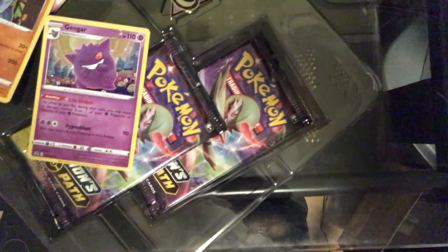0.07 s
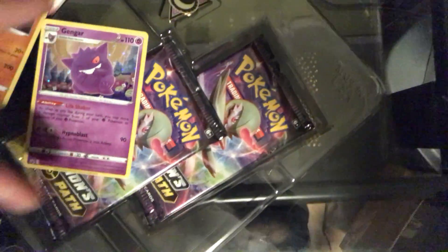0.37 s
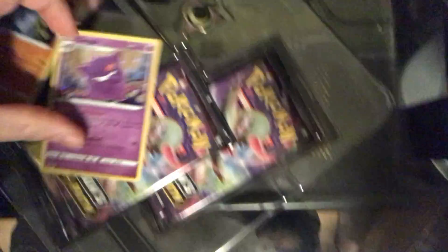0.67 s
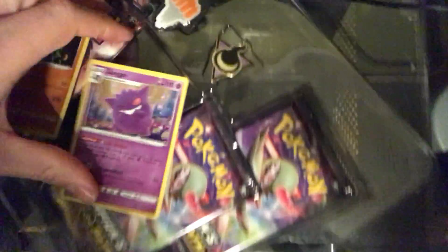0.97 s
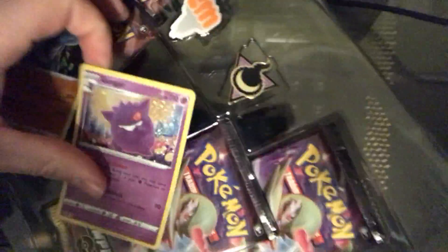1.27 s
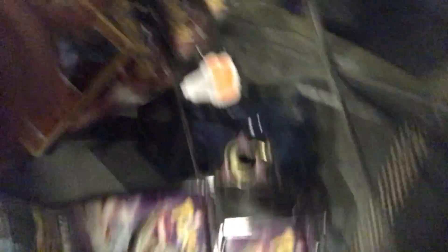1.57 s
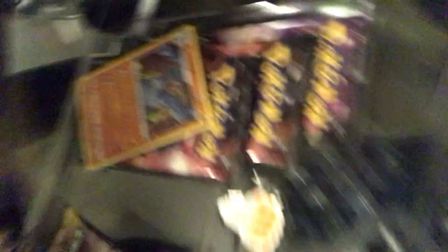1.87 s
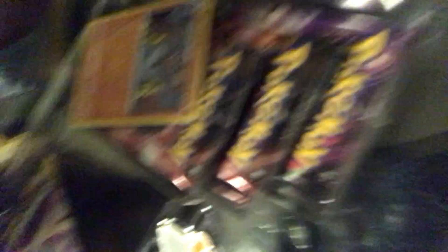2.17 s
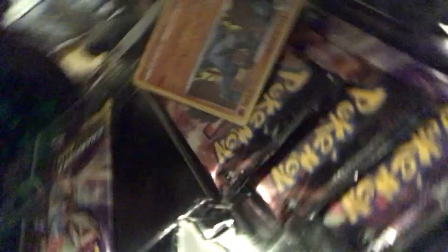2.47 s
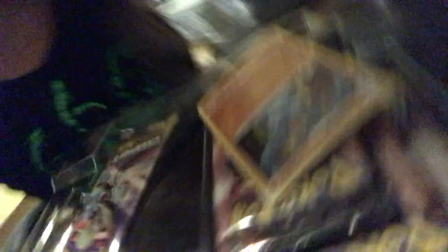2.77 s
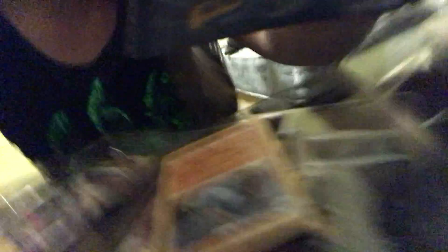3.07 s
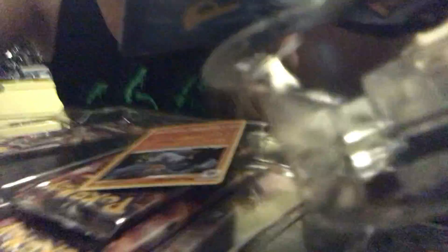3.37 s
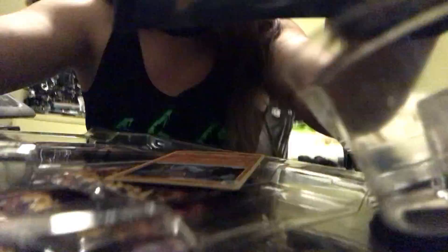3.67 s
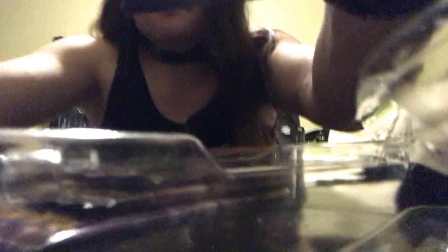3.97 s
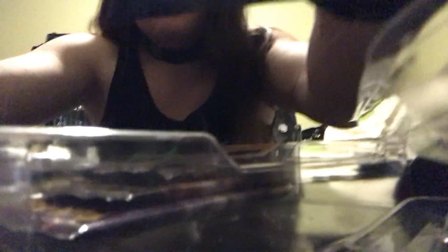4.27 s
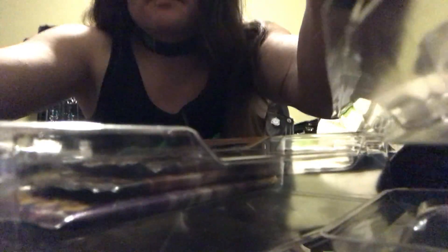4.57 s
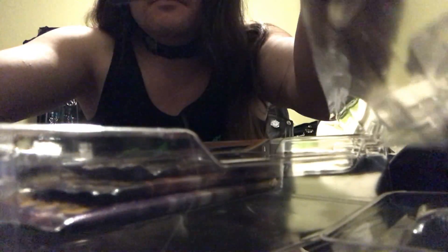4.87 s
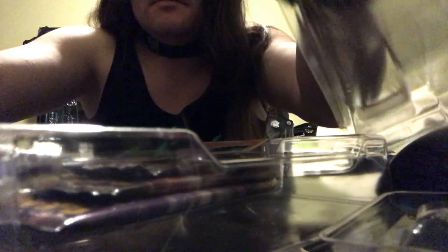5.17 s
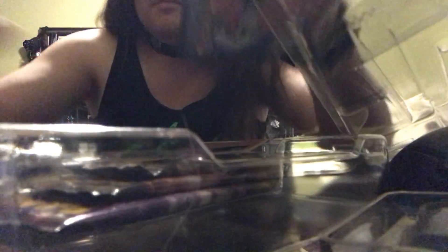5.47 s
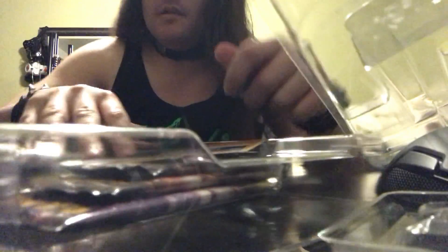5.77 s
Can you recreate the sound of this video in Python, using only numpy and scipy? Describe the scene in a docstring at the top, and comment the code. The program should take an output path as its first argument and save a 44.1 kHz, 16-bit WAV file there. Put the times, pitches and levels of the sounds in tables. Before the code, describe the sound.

A thin plastic tray is handled on a table in a small room, very close to the microphone, giving irregular hollow clicks and taps. A card swipes quickly over foil packs, and the plastic scrapes, creaks and squeaks faintly. The microphone rumbles as it is moved and lands with a hard knock. After a short lull, fingers tap the tray again over faint room hiss.

```python
"""On a table in a small room, a thin clear plastic tray is handled close to a small camera.
Each touch sends a bending wave through the sheet (treble first, bass last) and rings the tray.
Card and skin scrape, judder and squeak on it, creases crackle, and a card slides over foil packs.
The camera rumbles as it is moved and lands with a hard knock; then fingers tap the tray.
Underneath lie the room's hiss and, early on, a low hum."""
import sys
import numpy as np
from scipy import signal
from scipy.fft import rfft, irfft, next_fast_len
from scipy.io import wavfile
from scipy.ndimage import map_coordinates

SR = 44100
rng = np.random.default_rng(int(sys.argv[2]) if len(sys.argv) > 2 else 0)


def wav_out(sig):
    """Save sig, one row per channel (or a flat mono array), as 16-bit PCM at SR to the path in sys.argv[1]."""
    wavfile.write(sys.argv[1], SR, np.round(np.clip(np.atleast_2d(sig).T, -1, 1) * 32767).astype(np.int16))


N = 261407

# the room's reverb time: f/Hz, t60/s
ROOM_DECAY = [(100, 0.34), (400, 0.12), (1500, 0.29), (4000, .24), (12000, 0.17)]
# how busy the hands are on foil and plastic: t/s, level/dB
HAND_ACTIVITY = [(0.0, -46), (0.33, -82), (0.58, -104), (0.99, -62.5), (1.32, -63.5), (1.83, -56),
                 (1.98, -56), (2.46, -64), (2.66, -57.5), (3.65, -58), (3.93, -56.5), (5.12, -63),
                 (5.42, -64.5), (5.93, -72)]


def amp(db):
    """Decibels to gain."""
    return 10 ** (np.asarray(db) / 20)


def unit(x):
    """Scale to rms 1."""
    return x / np.sqrt(np.mean(x ** 2) + 1e-20)


def along(points, hz):
    """Read (f/Hz, value) points on a log frequency axis."""
    f, v = np.transpose(points)
    return np.interp(np.log(hz + 1), np.log(f + 1), v)


def automation(points):
    """Join (t/s, value) points into one value per sample."""
    return np.interp(np.arange(N) / SR, *np.transpose(points))


def wobble(rate):
    """A smooth random curve, rate knots a second."""
    return map_coordinates(rng.standard_normal(int(N * rate / SR) + 4), [np.arange(N) * rate / SR])


def gesture(middle_s, length_s):
    """The hand speeds up and slows again: a bell-shaped envelope."""
    return np.exp(-4 * ((np.arange(N) / SR - middle_s) / length_s) ** 2)


def filtered(x, response):
    """Pass x through a frequency response."""
    size = next_fast_len(N + SR // 2)
    return irfft(rfft(x, size) * response(np.fft.rfftfreq(size, 1 / SR)), size)[:N]


def coloured(x, spectrum):
    """EQ x with (f/Hz, level/dB) points and scale it to rms 1."""
    return unit(filtered(x, lambda hz: amp(along(spectrum, hz))))


def resonance(f, hz, width):
    """Response of one damped resonance."""
    return 1j * f * width / (hz * hz - f * f + 1j * f * width)


def causal(gain):
    """The minimum-phase response that has this gain."""
    cepstrum = irfft(np.log(np.maximum(gain, 1e-6)))
    half = len(cepstrum) // 2
    return np.exp(rfft(np.r_[cepstrum[0], 2 * cepstrum[1:half], np.zeros(half)]))


def tail(t60s, size):
    """Dense echoes of energy 1, dying away as the (f/Hz, t60/s) points say."""
    hz, t, noise = signal.stft(rng.standard_normal(size), SR, nperseg=128)
    decay = amp(-60 * t / along(t60s, hz)[:, None])
    echoes = signal.istft(noise * decay, SR, nperseg=128)[1][:size]
    return echoes / np.linalg.norm(echoes)


def ring(modes, t, spread_db):
    """Decaying modes, each struck a little differently every time."""
    return sum(amp(db + spread_db * rng.standard_normal() - 60 * t / t60) * np.sin(2 * np.pi * hz * t)
               for hz, db, t60 in modes)


def friction(grain_db, rate):
    """Noise whose strength jumps as tiny ridges catch and let go."""
    return rng.standard_normal(N) * amp(grain_db * np.clip(wobble(rate), -2, 2))


def room_tone(level_db=-69.5):
    """The steady hiss of the room."""
    # room tone EQ: f/Hz, level/dB
    air_eq = [(65, -36.5), (110, -18), (210, -10.5), (243, -5), (264, -11.5), (392, -17), (1870, -26),
              (3800, -32), (4220, -29), (5760, -34), (16000, -37)]
    return amp(level_db) * coloured(rng.standard_normal(N), air_eq)


def hum(settled_hz=56.3, sag_hz=4.46, sag_s=0.446, level_db=-64, stop_s=1.44, fade_s=0.028):
    """A low hum sinks towards a steady pitch and stops."""
    t = np.arange(N) / SR
    hz = settled_hz + sag_hz * np.exp(-t / sag_s)
    release = np.exp(-np.maximum(t - stop_s, 0) / fade_s)
    return amp(level_db) * release * unit(np.sin(2 * np.pi * np.cumsum(hz) / SR))


def camera_rumble():
    """Handling the camera makes a bumpy low rumble."""
    # how hard the camera is handled: t/s, level/dB
    handling = [(0.0, -52.5), (0.4, -76), (0.99, -66.5), (1.62, -73), (2.62, -64), (3.05, -70.5),
                (3.2, -56), (4.0, -58), (4.94, -65.5), (5.3, -70), (5.48, -48), (5.93, -58)]
    # rumble EQ: f/Hz, level/dB
    rumble_eq = [(12, -42), (24, -22), (40, 3.5), (70, -2), (110, 3), (200, -12.5), (340, -12.5),
                 (550, -19), (900, -27.5), (1500, -78.5)]
    return amp(automation(handling)) * coloured(friction(grain_db=2.5, rate=18), rumble_eq)


def tray_taps(size=16384):
    """Each contact: a falling chirp, echoes from the tray's edges, its modes, a shudder and the room."""
    # contacts: t/s, strength/dB, weight/dB, hardness/dB, panel f/Hz, free ringing/dB
    contacts = [(.0016, -8.5, -2, 7, 945, 5), (0.0165, -17, 3, 8, 660, 1),
                (0.108, -9.5, -32, -5, 680, -1.5), (0.277, -12.5, 5, -17, 570, -9),
                (0.3681, -13.5, -7, -13, 620, -2), (0.58, -10, -1, 2.5, 690, 3),
                (.589, 5, -27, -3, 1100, -11.5), (.7457, 4.5, -10, 15, 2200, -5.5),
                (0.7887, 4, -10, 0, 1060, -6.5), (.8599, 7, -14, -21, 695, -2.5),
                (.8702, 9.5, -31, -1.5, 1000, -4), (0.8736, 9.5, -24, -4.5, 1060, -8.5),
                (0.8869, 2, -11.5, -15, 1040, -1.5), (.9218, -15.5, -8, 14.5, 1050, -3),
                (1.0391, 2.5, -7, -14, 630, -10.5), (1.0482, -11.5, -1, 8.5, 1140, -1),
                (1.1073, -13, -10, 3, 1010, -11), (1.1266, -15, -4, 12, 1040, -10),
                (1.2026, 1.5, -8, -16, 630, -15), (1.248, -26, 17, 15, 800, -4), (1.3, -4, 4, -2, 960, -11),
                (1.3423, -19.5, -19, 25.5, 2000, -11), (1.3512, -8.5, -20, 18, 2100, -14),
                (1.4641, -21.5, 14, -11, 600, -13), (1.575, 3, -24, 9, 970, -10.5),
                (1.5907, -7, 4.5, 17.5, 1460, -4), (1.866, -7.5, -8.5, 6.5, 2330, 3.5),
                (1.9734, -10.5, 0, -8.5, 940, -1), (2.0143, -16.5, 5, -4, 1000, -3),
                (2.0467, -16, 0, 12.5, 1260, 5), (2.0837, -24, 3, 15, 2180, 4),
                (2.1258, -2.5, -5, -6.5, 620, -2.5), (2.201, -13.5, 4.5, 19.5, 2400, 2),
                (2.5114, -12.5, 6, -7, 1170, -2), (2.6353, -26, 11, 18.5, 2000, 1),
                (2.828, -16, 6, -18, 1930, -12), (2.9482, -20.5, 7, 13, 790, -10),
                (3.0781, 8.5, -4, -5, 1000, -5.5), (3.1717, 0, -1, -6, 950, -4.5),
                (3.18, -15, -8, -26, 640, 5), (3.2689, -4, 4, -6.5, 1480, 2.5),
                (3.3298, -5, -3, -6, 730, -5), (3.3791, -14.5, 10, -2.5, 1000, -3.5),
                (3.4535, -20, 16.5, -4, 1170, -0.5), (3.5649, -15.5, 24.5, -1, 630, -7.5),
                (3.6504, -21.5, 25, -16.5, 640, -4), (3.6639, -5.5, 10, -20, 600, -25),
                (3.7797, -8.5, 5.5, -9.5, 600, -4), (3.8279, 13.5, 26.5, 1.5, 278.7, -16),
                (3.9848, -5.5, -13, -19, 760, -15), (4.0256, 5.5, -3.5, -14, 620, -1),
                (4.0468, 9.5, 11, 8, 569, -4.5), (4.077, -9.5, 3.5, -9, 1100, -16.5),
                (4.1587, -1.5, 12, -16.5, 720, -11), (4.217, -28.5, 4, 17.5, 970, -25),
                (4.2997, -9.5, 22.5, -23, 590, -16.5), (4.3485, 6, 16.5, -56, 1000, -16.5),
                (4.4909, -11, 21, -26, 620, -24), (4.5698, -16.5, 32, -14, 1020, -15),
                (4.5996, -10, 4.5, 4, 680, -11.5), (5.282, -20, -2, -8.5, 1500, 0),
                (5.2985, -5.5, 18, 0.5, 1380, 1), (5.4015, -7, -4, 4, 570, 7.5),
                (5.4085, -0.5, 12, 7.5, 690, 1), (5.4591, -1, 9.5, 2, 620, -3),
                (5.5033, -2, 9.5, -7.5, 1380, -3.5), (5.5843, -7.5, 6.5, 1.5, 1400, -7.5),
                (5.6228, -7, 18, -12, 1350, -7.5), (5.667, -24, 0, -2, 1400, -9),
                (5.6925, -13.5, 17.5, -13, 1400, -4), (5.759, -21.5, 6, -1, 1430, -3.5),
                (5.7983, -18.5, 26, 10.5, 1080, 1), (5.819, 4.5, -22, -20, 1430, -13),
                (5.8451, -9.5, 11, 6, 1380, -3), (5.9026, -3.5, -14, -2, 1340, -2.5)]
    # force of a medium contact: f/Hz, level/dB
    force_eq = [(12, -64.5), (30, -22.5), (62, 0), (120, -3.5), (350, -2.5), (1050, 0.5), (2700, -8.5),
                (7500, -22), (15500, -30.5)]
    # how far the weight of a push lifts the bass: f/Hz, share
    weight_share = [(80, 1), (350, 0.58), (950, 0.016)]
    # how far the hardness of an edge lifts the treble: f/Hz, share
    hardness_share = [(1200, 0.019), (2700, 0.61), (7500, 1)]
    # the tray's modes: f/Hz, level/dB, t60/s
    tray_modes = [(147, -11.5, .2), (194.7, -1.5, 0.082), (265.5, -6.5, 0.05), (344, -11, 0.05),
                  (408, -3, 0.063), (618, -2.5, 0.11), (668, 3.5, 0.13), (907, -7.5, 0.092),
                  (1195, 1.5, 0.046), (1290, -5.5, 0.11), (1868, -1.5, 0.092), (2060, -1, 0.15),
                  (2340, -5.5, 0.041), (2540, -5, 0.073), (2936, 5, 0.049), (3330, -3, .08),
                  (3370, 1, 0.03), (4615, -0.5, 0.05)]
    edge_decay = [(100, 0.32), (300, 0.12), (600, 0.11), (2000, 0.038), (6000, 0.031), (14000, 0.013)]
    shudder_db, shudder_rise_s, shudder_t60_s = -7, 0.03, 0.42
    t, f = np.arange(size) / SR, np.fft.rfftfreq(size, 1 / SR)
    fade = np.minimum(1, 2 - 2 * np.arange(size) / size) ** 2
    force_db, bass, treble = along(force_eq, f), along(weight_share, f), along(hardness_share, f)
    # bending waves are slower at low pitch: each frequency arrives about one cycle late
    dispersion = np.exp(-2j * np.pi * 0.7954 * np.log(1 + f / 45))
    chirp = amp(-1.5 + along([(1500, -3.1), (4000, -2), (10000, -1)], f)) * dispersion
    scatter_gain = amp(along([(800, -16), (3000, -7.5), (10000, -9)], f))
    out = np.zeros(N + 2 * size)
    for s, db, weight_db, hardness_db, panel_hz, ring_db in contacts:
        panel = 0.68 + 1.16 * np.abs(resonance(f, panel_hz, width=0.056 * panel_hz))
        strike = causal(amp(db + force_db + weight_db * bass + hardness_db * treble) * panel)
        # creases smear part of the treble over a few milliseconds
        scatter = rfft(tail([(1000, 0.019), (14000, 0.006)], size)) * scatter_gain
        edges = tail(edge_decay, size)
        modes = ring(tray_modes, t, spread_db=-2.5) * (1 - np.exp(-t / 0.002))
        ringing = amp(ring_db) * (edges + amp(-47.5) * modes)
        # the table shudders after a push: a low rumble swells and dies
        rocking_envelope = (1 - np.exp(-t / shudder_rise_s)) * amp(-60 * t / shudder_t60_s)
        rocking = rng.standard_normal(size) * rocking_envelope
        rocking /= np.linalg.norm(rocking)
        shudder = amp(shudder_db + ring_db) * rfft(rocking) * resonance(f, hz=95, width=55)
        reverb = amp(-20.5) * tail(ROOM_DECAY, size) * (1 - np.exp(-t / 0.0081))
        hit = irfft(strike * (chirp + scatter + shudder + rfft(ringing + reverb)))
        out[round(s * SR):][:size] += hit * fade
    return out[:N]


def rubbing():
    """Card and skin rub the sheet: a hollow scrape and a fine hiss, in strokes over a light rustle."""
    # broad strokes: middle t/s, length/s, scrape level/dB, hiss level/dB
    strokes = [(.01, 0.05, -43.5, -60), (0.678, 0.075, -65, -60.5), (0.748, 0.049, -50, -54),
               (0.793, 0.037, -54, -57), (0.917, 0.09, -53, -64), (1.142, 0.13, -52.5, -63.5),
               (1.301, 0.019, -52, -58), (1.433, 0.2, -84, -60), (1.571, 0.03, -50, -75),
               (1.746, 0.034, -48, -52.5), (2.075, 0.026, -59, -58.5), (2.201, 0.032, -61, -50.5),
               (2.268, 0.23, -60.5, -64), (2.775, 0.044, -54, -67), (2.943, 0.05, -58.5, -65),
               (3.075, 0.02, -45.5, -62), (3.135, 0.062, -57, -68), (3.172, 0.012, -47, -72),
               (3.264, 0.0084, -49, -79), (3.778, 0.051, -53, -64), (3.844, 0.047, -54, -66.5),
               (4.008, .06, -54, -65), (4.801, 0.047, -65, -74), (5.068, 0.032, -60, -65),
               (5.2, 0.018, -61.5, -68), (5.825, 0.049, -54, -61.5), (5.909, 0.076, -45.5, -57.5)]
    # the hollow body of the rub: f/Hz, level/dB
    scrape_eq = [(180, -58.5), (300, -11), (424, -3), (787, 0), (906, -3), (1210, -7), (1340, -0.5),
                 (1680, -11), (2560, -12), (4000, -21.5), (5200, -54.5), (8800, -120)]
    # its fine top end: f/Hz, level/dB
    hiss_eq = [(1060, -39), (1800, -7.5), (2430, -8), (3260, -3.5), (3710, -2.5), (4970, -7.5), (5490, 0),
               (6960, -7), (9080, -11), (10300, -13), (11300, -9), (14500, -10), (15300, -16),
               (16000, -21.5)]
    rustle = amp(automation(HAND_ACTIVITY) + 5 * wobble(rate=12))  # the rubbing comes and goes
    scrape_gain, hiss_gain = amp(-8) * rustle, amp(-18.5) * rustle
    for s, length, scrape_db, hiss_db in strokes:
        speed = gesture(s, length)
        scrape_gain = np.hypot(scrape_gain, amp(scrape_db) * speed)
        hiss_gain = np.hypot(hiss_gain, amp(hiss_db) * speed)
    scrape = coloured(friction(grain_db=4.5, rate=140), scrape_eq)
    hiss = coloured(friction(grain_db=5, rate=4700), hiss_eq)
    return scrape_gain * scrape + hiss_gain * hiss


def judder():
    """Stick-slip pulses, even or ragged, make the sheet groan."""
    # groans: middle t/s, length/s, slip rate/Hz, raggedness 0-1, level/dB
    groans = [(0.025, 0.12, 195, .2, -49.5), (1.467, 0.011, 214, 0.35, -58.5),
              (1.595, 0.049, 315, .15, -50), (2.545, 0.046, 180, 0.17, -42.5),
              (2.697, 0.1, 247, .25, -55.5), (2.746, 0.067, 275, .2, -47.5), (2.823, .03, 297, 0.15, -57),
              (3.193, 0.074, 310, .05, -50.5), (3.307, 0.032, 344, 0.22, -49),
              (3.437, 0.014, 330, .15, -52)]
    sheet_eq = [(40, -27), (130, 8), (190, 9), (300, 1), (430, -1.5), (700, -8), (1300, -14.5),
                (3000, -30), (9000, -41)]
    out = np.zeros(N)
    for s, length, rate, ragged, db in groans:
        slip_count = np.floor(np.cumsum(rate * (1 + ragged * wobble(250))) / SR)
        slips = np.diff(slip_count, prepend=0) * amp(2 * wobble(200))
        out += amp(db) * gesture(s, length) * coloured(slips, sheet_eq)
    return out


def crinkle(pops_per_s=35, decay_s=0.00084):
    """Tiny creases pop at random, each a millisecond of crackle, louder when the hands are busy."""
    # crackle EQ: f/Hz, level/dB
    crisp_eq = [(800, -28), (2500, -2.5), (6000, -4), (10000, -8.5), (14000, -7), (16000, -2)]
    hands_db = automation(HAND_ACTIVITY)
    level_db = -81.5 + 0.28 * (hands_db - hands_db.mean())
    pops = (rng.random(N) < pops_per_s / SR) * amp(2.7 * np.clip(rng.standard_normal(N), -2, 2))
    bursts = signal.lfilter([1], [1, -np.exp(-1 / (SR * decay_s))], pops)
    return amp(level_db) * coloured(bursts * rng.standard_normal(N), crisp_eq)


def card_swipe(start_s=1.765, end_s=1.876, attack_s=0.0023, release_s=0.017):
    """The card catches the foil packs, slides over them in one quick stroke and leaves them."""
    # card on foil: f/Hz, level/dB
    foil_eq = [(120, -60), (200, -25), (278, -26), (340, -6.5), (380, -16), (509, -1), (1160, -16.5),
               (1270, -9), (1980, -10), (2250, -9.5), (5940, -15), (7970, -21), (13800, -29), (16000, -28)]
    t = np.arange(N) / SR
    attack = np.clip((t - start_s) / attack_s, 0, 1)
    level_db = -46.5 + 2 * (np.minimum(t, end_s) - start_s)
    release = np.exp(-np.maximum(t - end_s, 0) / release_s)
    return attack * amp(level_db) * release * coloured(friction(grain_db=3.5, rate=1900), foil_eq)


def noise_band(phase, width):
    """A hoarse tone: noise about width Hz wide around a running phase."""
    return unit(wobble(width) * np.cos(phase) + wobble(width) * np.sin(phase))


def edge_squeak(edge_hz=3080):
    """Friction feeds a dragging edge's resonances in spurts; the main one shifts with the contact."""
    # squeaks: middle t/s, length/s, f/Hz, relative level/dB
    squeaks = [(2.082, 0.019, 2727, -48.5), (2.193, 0.059, 2393, -52), (2.266, 0.042, 2510, -55.5),
               (2.372, 0.18, 2390, -64), (2.595, 0.043, 2010, -54), (2.677, 0.23, 2118, -61.5),
               (2.8, 0.087, 2010, -59), (2.91, 0.26, 2037, -64.5)]
    hz = automation([(s, pitch) for s, _, pitch, _ in squeaks])
    spurts = sum(amp(db) * gesture(s, length) for s, length, _, db in squeaks)
    phase = 2 * np.pi * np.cumsum(hz * (1 + 0.018 * wobble(45))) / SR
    edge = noise_band(2 * np.pi * edge_hz * np.arange(N) / SR, width=380)
    rasp = noise_band(phase, width=400) + amp(-4) * noise_band(0.9 * phase, width=1700)
    flutter = amp(-2.5 + 2.7 * wobble(82))
    return spurts * flutter * (rasp + amp(-11.5) * edge)


def camera_landing(size=22050):
    """A hard knock: a few strong cycles of the camera body, the table's ring and a rattle of the tray."""
    # the camera comes down on the table: t/s, gain/dB
    landings = [(4.0465, -1)]
    # modes of camera and table: f/Hz, level/dB, t60/s
    knock_modes = [(80, -31.5, 0.39), (148, -27, 0.18), (298, -31.5, 0.061), (420, -22, 0.075),
                   (622, -11.5, 0.027), (920, -34, .1), (1100, 1.5, 0.0091), (1127, -29.5, 0.095),
                   (1500, -34, 0.12), (1766, -31.5, 0.087), (2100, -25.5, 0.053), (2530, -19.5, 0.045)]
    rattle_eq = [(150, -22), (500, 1.5), (1700, 2), (3000, 3), (6000, -22), (14000, -38.5)]
    t, f = np.arange(size) / SR, np.fft.rfftfreq(size, 1 / SR)
    knock = ring(knock_modes, t, spread_db=1.5) * (1 - np.exp(-t / 0.0004))
    reverb = amp(-24) * signal.fftconvolve(knock, tail(ROOM_DECAY, size))[:size]
    rattle = tail([(500, 0.22), (4000, 0.13)], size) * (1 - np.exp(-t / 0.0014))
    rattle = irfft(rfft(rattle) * amp(along(rattle_eq, f)), size)
    fade = np.minimum(1, 2 - 2 * np.arange(size) / size)
    out = np.zeros(N + 2 * size)
    for s, db in landings:
        out[round(s * SR):][:size] += amp(db) * (knock + reverb + rattle * fade)
    return out[:N]


def plastic_walls(x):
    """Close reflections comb the sound and make it hollow."""
    # reflections off the plastic around the microphone: delay/s, gain
    echoes = [(.00082, 0.28), (.00151, -.22), (.00263, .2), (.0043, -0.16)]
    return filtered(x, lambda f: 1 + sum(gain * np.exp(-2j * np.pi * f * s) for s, gain in echoes))


def scene():
    """The mono mix at the microphone: hits, friction and the background bed."""
    hits = tray_taps() + camera_landing()
    rustles = plastic_walls(rubbing() + card_swipe() + crinkle())
    return (hits + rustles + edge_squeak() + judder() + camera_rumble() + hum() + room_tone())[None]


def record(dry, top_hz=16300):
    """The microphone trims the sub-bass and colours the treble; the camera cuts all above top_hz."""
    # microphone response: f/Hz, level/dB
    mic_eq = [(20, -15), (45, 0), (9000, -0.5), (10400, -2), (12000, -0.5), (15000, 3), (16300, -9.5)]
    return np.array([filtered(x, lambda hz: amp(along(mic_eq, hz)) * (hz < top_hz)) for x in dry])


dry = scene()
out = record(dry)
wav_out(out)
```